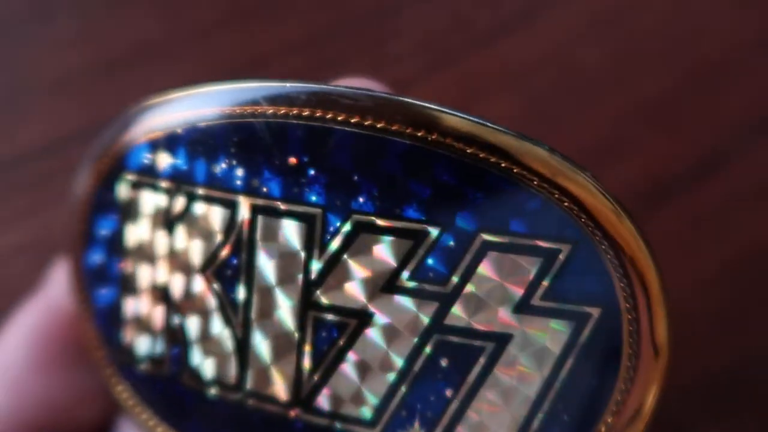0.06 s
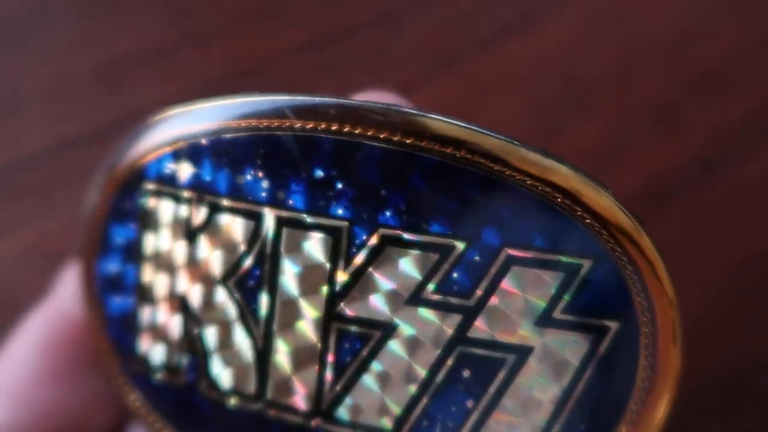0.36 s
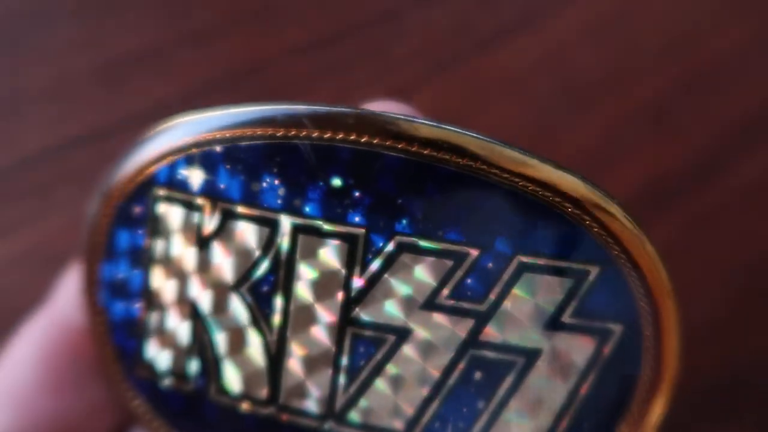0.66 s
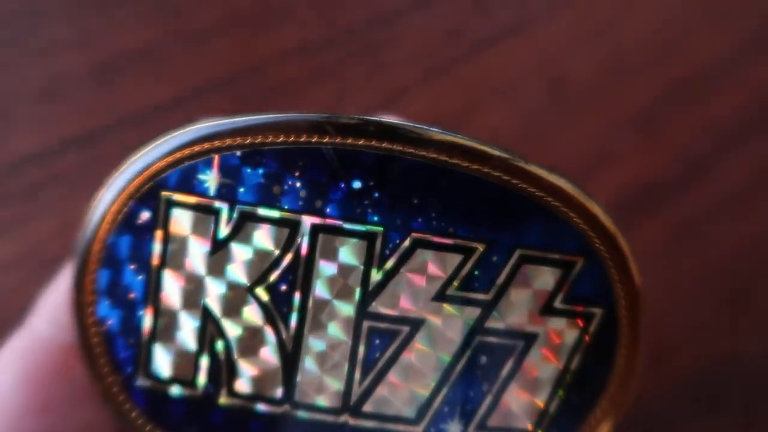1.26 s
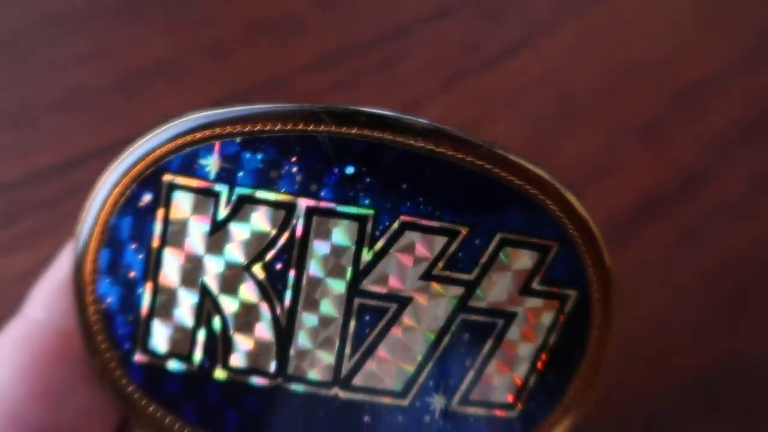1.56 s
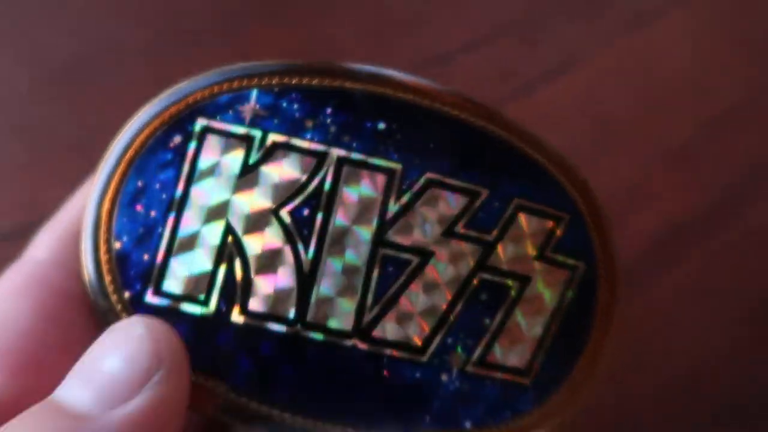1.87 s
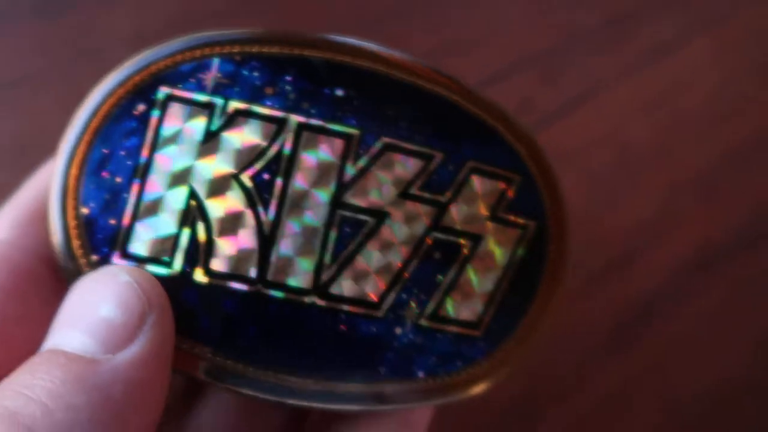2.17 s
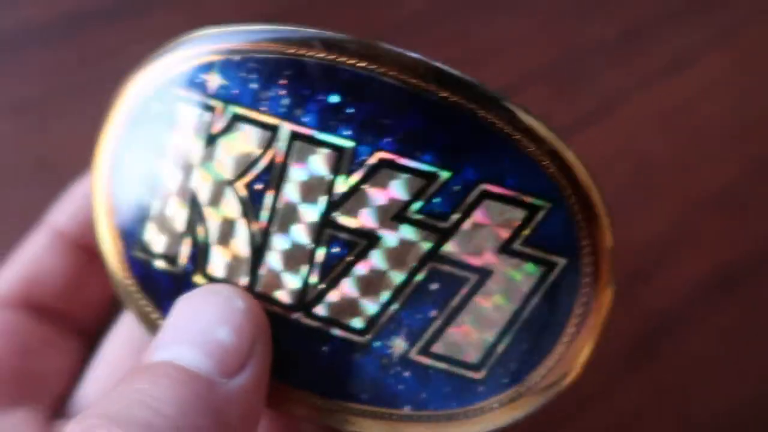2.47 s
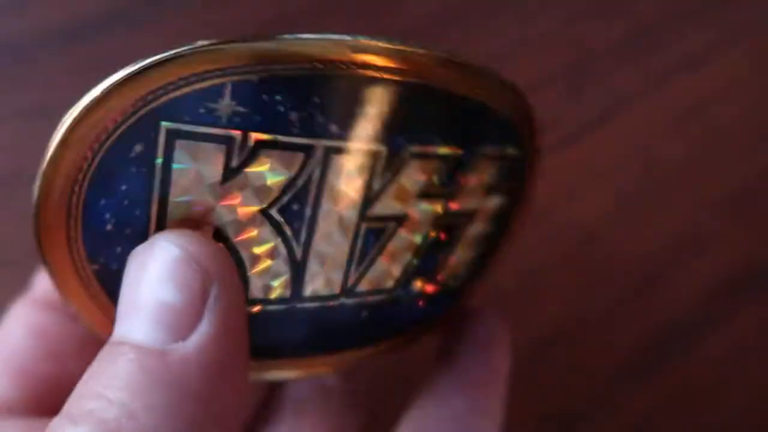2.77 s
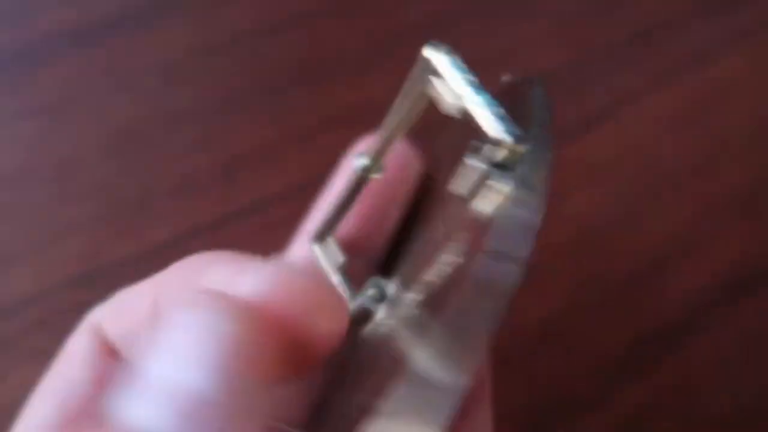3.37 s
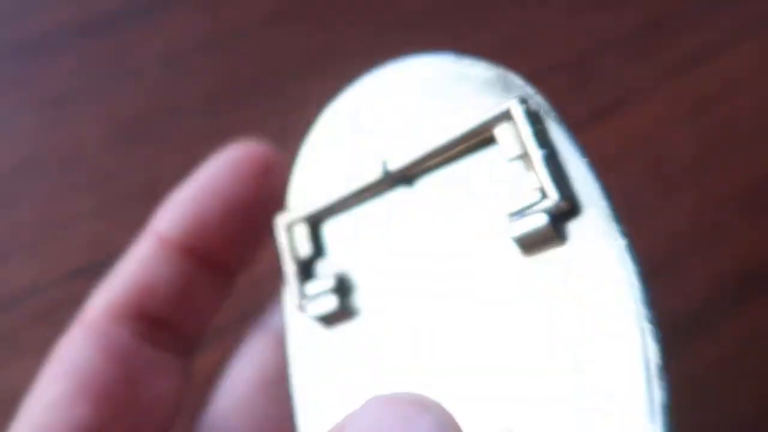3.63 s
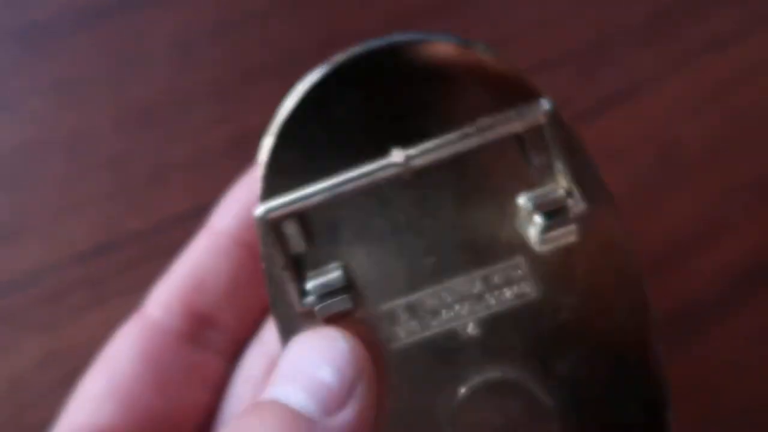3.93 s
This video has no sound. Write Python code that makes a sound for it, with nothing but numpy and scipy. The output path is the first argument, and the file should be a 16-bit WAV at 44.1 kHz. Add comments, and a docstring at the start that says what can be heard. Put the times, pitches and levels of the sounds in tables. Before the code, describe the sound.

A metal belt buckle clicks in the hand, close up, over faint room rumble and hiss. After a near-quiet start, light damped ticks come from about 1.9 seconds. At 2.8 seconds a sharper click starts a quick, light rattle of the loose loop. At 3.6 seconds the loop hits the plate with the loudest clatter, bright and briefly ringing. A few smaller clicks follow until 4 seconds.

```python
"""A metal belt buckle is turned over in the hand, close to a stereo microphone in a quiet room.
Its loose wire loop ticks in the hinges, damped by the fingers, scrapes, then falls against the plate
and rings. The held plate knocks dully and fingertips whisper on the metal. Room rumble, mains hum
and faint hiss lie below; a limiter ducks after the loudest clack."""
import sys
import numpy as np
from scipy import signal
from scipy.fft import rfft, irfft, next_fast_len
from scipy.io import wavfile
from scipy.ndimage import uniform_filter1d, minimum_filter1d, map_coordinates

SR = 44100
rng = np.random.default_rng(int(sys.argv[2]) if len(sys.argv) > 2 else 0)


def bounce(signal):
    """Save signal as a 16-bit WAV file at the path given by the first command-line argument."""
    frames = np.transpose(np.atleast_2d(signal))
    limited = np.clip(frames, -1, 1)
    pcm = np.round(limited * 32767).astype(np.int16)
    wavfile.write(sys.argv[1], SR, pcm)


N = 176400

# Stereo image of the contact noise. Each row: frequency in Hz, left-right likeness from -1 to 1.
CONTACT_LIKENESS = [(500, 0.94), (3000, 1), (5000, 1), (8000, 0.54), (12000, -0.52)]
CONTACT_T60_S = 0.027


def amp(db):
    """Decibels to gain."""
    return 10 ** (np.asarray(db) / 20)


def unit(x):
    """Scale to rms 1."""
    return x / np.sqrt(np.mean(x ** 2) + 1e-20)


def along(points, hz):
    """Interpolate (Hz, value) points on a log frequency axis."""
    f, v = np.transpose(points)
    return np.interp(np.log(hz + 1), np.log(f + 1), v)


def filtered(x, response):
    """Filter x by a gain that is a function of frequency."""
    n = x.shape[-1]
    m = next_fast_len(n + 4096)
    return irfft(rfft(x, m) * response(np.fft.rfftfreq(m, 1 / SR)), m)[..., :n]


def add(out, start, x):
    """Mix x into out from start, in seconds."""
    i = max(0, round(start * SR))
    out[:, i:i + x.shape[-1]] += x[..., :N - i]


def fade(t, t60):
    """Exponential decay, 60 dB down at t60."""
    return np.exp(-np.log(1000) * t / np.maximum(t60, 1e-4))


def stereo(pair, spectrum, likeness):
    """Two unrelated signals become left and right with a given colour and likeness, rms 1."""
    def mid_side_gains(hz):
        angle = np.arccos(np.clip(along(likeness, hz), -1, 1)) / 2
        return amp(along(spectrum, hz)) * [np.cos(angle), np.sin(angle)]
    mid, side = filtered(pair, mid_side_gains)
    return unit(np.array([mid + side, mid - side]))


def room_tone():
    """The quiet room at the microphone: slightly patchy rumble and hiss, with mains hum."""
    # Rumble and hiss. Each row: frequency in Hz, relative level in dB.
    spectrum = [(15, -77), (25, -24.5), (53, -1), (116, -5), (164, -9.5), (204, -12), (313, -13),
                (469, -14.5), (684, -22), (997, -21), (1530, -26.5), (1850, -25.5), (2060, -27),
                (4620, -33), (5430, -35.5), (13200, -46.5), (15500, -65)]
    # Centred rumble, wide hiss. Each row: frequency in Hz, left-right likeness.
    likeness = [(60, 1.0), (150, 0.95), (380, 0.09), (950, -0.017), (2380, -0.17), (5980, -0.09),
                (15000, -0.13)]
    # Mains tones. Each row: frequency in Hz, level in dB.
    mains = [(60, -62), (119.5, -58)]
    noise_db, patchy_db = -49, 2
    bins = signal.stft(rng.standard_normal((2, N)), nperseg=1024)[2]
    patches = uniform_filter1d(rng.standard_normal(bins.shape[1:]), size=6, axis=0)
    patches = uniform_filter1d(patches, size=9, axis=1)
    noise = signal.istft(bins * amp(patchy_db * unit(patches)), nperseg=1024)[1][:, :N]
    t = np.arange(N) / SR
    hum = sum(amp(db) * np.sqrt(2) * np.sin(2 * np.pi * (hz * t + rng.random())) for hz, db in mains)
    return amp(noise_db) * stereo(noise, spectrum, likeness) + hum


def room_reflections(x):
    """Quick reflections from table and hand reach the microphone with the room's faint tail."""
    # The tail's decay. Each row: frequency in Hz, t60 in seconds.
    decay = [(200, 0.51), (2000, 0.35), (8000, 0.27), (14000, 0.19)]
    # The tail's colour. Each row: frequency in Hz, gain in dB.
    colour = [(200, 12), (1200, -1.5), (3200, 3.5), (4450, -7), (5250, -5), (5620, 6.5), (6000, 1.5),
              (7700, -0.5), (8150, 7), (8600, 3.5), (10500, -1.5), (11700, 2.5), (13000, -2.5),
              (14600, 1.5)]
    tail_db, early_db, early_t60_s = -22, -15.5, .04
    hz, t, bins = signal.stft(rng.standard_normal((2, SR // 2)), SR, nperseg=256)
    tail = signal.istft(bins * fade(t, along(decay, hz)[:, None]), SR, nperseg=256)[1]
    tail = filtered(tail / np.linalg.norm(tail[0]), lambda hz: amp(along(colour, hz)))
    early = rng.standard_normal(tail.shape) * fade(np.arange(tail.shape[1]) / SR, early_t60_s)
    response = amp(tail_db) * tail + amp(early_db) * early / np.linalg.norm(early[0])
    response = np.pad(response, ((0, 0), (SR // 400, 0)))  # 2.5 ms after the direct sound
    return signal.fftconvolve(x, response, axes=1)[:, :N]


def finger_rubs():
    """Skin slides on metal: a faint narrow whisper that swells and fades."""
    # Each row: start in seconds, length in seconds (capped at 0.5), centre in Hz, level in dB.
    rubs = [(0.275, 0.14, 1710, -63.5), (1.462, .1, 810, -57), (1.828, 0.052, 1000, -58),
            (2.246, 0.27, 1028, -63), (2.519, 0.62, 1880, -64), (2.701, 0.2, 2600, -65.5),
            (3.351, 0.14, 2590, -60.5)]
    width = 0.07  # share of the centre frequency
    out = np.zeros((2, N))
    for start, length, centre, db in rubs:
        noise = rng.standard_normal(SR // 2)
        skin = filtered(noise, lambda hz: 1 / (1 + ((hz / centre - 1) / width) ** 2))
        n = min(int(length * SR), len(skin))
        add(out, start, amp(db) * unit(skin)[:n] * np.hanning(n) ** .5)
    return out


def plate_knocks():
    """A soft blow on the held plate stirs only its low modes."""
    # Each row: start in seconds, level in dB.
    blows = [(2.9223, -23.5), (2.9252, -28), (2.9277, -22), (3.6479, -31)]
    # The plate's low modes. Each row: frequency in Hz, level in dB, t60 in seconds.
    modes = [(170, -40, 0.046), (334.6, -9.5, 0.11), (412.4, -19, 0.13), (476, -9, 0.048), (648, -5, 0.094),
             (840, -18.5, 0.013), (1260, -28, 0.09), (1810, -23.5, 0.11)]
    out, t = np.zeros((2, N)), np.arange(SR // 4) / SR
    knock = sum(amp(db) * fade(t, t60) * np.sin(2 * np.pi * hz * t) for hz, db, t60 in modes)
    for start, db in blows:
        add(out, start, amp(db) * knock)
    return out


def metal_ring(t, ring_share, main_hz, ping_db, colour):
    """Loop and plate ring after one contact; a finger's grip shortens the modes and retunes the loop."""
    # Each row: frequency in Hz, level in dB, free t60 in seconds, left-right phase in radians.
    modes = [ (1219, -25, .2, .2), (1560, -27, .06, .2), (2110, -24, .05, .2), (3085, -20, .09, .3),
             (3290, -25, .05, .3), (3560, -24, .04, .4), (4330, -10, .05, .6), (4455, -1, .06, .7),
             (4530, -10, .055, .95), (5590, -3, .045, .8), (5700, -14, .045, 1.0), (6200, -24, .04, 1.0),
             (7970, -11, .03, 1.2), (8200, -11, .04, 1.3), (8700, -13, .05, 1.3), (10650, -19, .05, 1.5),
             (11700, -12, .06, 2.0), (12120, -7, .055, 2.1), (12900, -19, .04, 2.0), (14520, -19, .1, 1.5),
             (15300, -17, .06, 1.5)]
    scatter_db, detune, scatter_rad, attack_s = 1.8, .003, .3, 0.0014
    free_main_hz = 4465
    hz, db, t60, lead = np.transpose(modes)[:, :, None]
    strength, mistuning, turn = rng.standard_normal((3, len(hz), 1))
    is_ping = (hz > 3000) & (hz < 3400)  # the plate's ping
    is_loop = (hz > 4000) & (hz < 6000)
    gain = amp(db + scatter_db * strength + colour(hz) + ping_db * is_ping)
    envelope = gain * fade(t, t60 * ring_share)
    pitch = np.where(is_loop, main_hz / free_main_hz, 1)
    phase = 2 * np.pi * hz * pitch * (1 + detune * mistuning) * t
    lead = lead + scatter_rad * turn  # the buckle turns in front of the microphone
    pair = np.array([(envelope * np.sin(phase + side * lead / 2)).sum(0) for side in (1, -1)])
    return pair * (1 - np.exp(-t / attack_s))


def hinge_scrapes():
    """The loop slides in its hinges: dense tiny slips sound as grit and drive the metal's modes."""
    # Each row: start in seconds, length in seconds, level in dB.
    slides = [(2.952, 0.0078, -34), (3.095, 0.042, -39), (3.647, 0.0243, -28), (3.831, 0.0086, -35)]
    # The grit's colour. Each row: frequency in Hz, relative level in dB.
    spectrum = [(300, -25), (1200, -10.5), (2000, -3), (3200, 8), (4800, -4), (8300, -7), (10000, -9),
                (12000, 2.5), (15500, -12)]
    slips_per_s, fade_db, grit_db = 1900, 9, 1.5
    out, t = np.zeros((2, N)), np.arange(SR // 8) / SR
    for start, length, db in slides:
        slips = rng.standard_normal((2, len(t))) * (rng.random(len(t)) < slips_per_s / SR)
        ring = metal_ring(t, ring_share=.35, main_hz=4400, ping_db=0, colour=np.zeros_like)
        metal = signal.fftconvolve(slips[:1], ring, axes=1)[:, :len(t)]
        grit = amp(grit_db) * stereo(slips, spectrum, CONTACT_LIKENESS)
        stroke = amp(-fade_db * t / length) * fade(np.maximum(t - length, 0), CONTACT_T60_S)
        add(out, start, amp(db) * stroke * (unit(metal) + grit))
    return out


def loop_clicks():
    """Each contact of the loop is a short crack and a ring, coloured by where and how hard it lands."""
    # Each row: start in seconds, level in dB, share of the free ring time, crack in dB, main mode in Hz,
    # plate's ping in dB, then five tone gains in dB: body, second mode, treble, top, air.
    contacts = [ (.642, -47.5, 0.33, -3, 4700, 0, -6, -10, -10, -8, -25),
                (1.575, -44, 0.77, 6.5, 4350, -5, 8.5, -6, 0, -12, -28),
                (1.8602, -25, 0.4, 3, 4460, -16, 5, 9, 3, -13, -10),
                (1.8654, -20.5, 0.3, 0, 4500, -10, 0.5, 4.5, -18, -3.5, -13),
                (2.21, -24, 0.31, 3.5, 4290, 3.5, -2.5, 1.5, -7, -4.5, -26),
                (2.4896, -20.5, 0.25, 7.5, 4350, 11.5, -7, -5, 9, -8.5, -6),
                (2.669, -21.5, 0.38, 4, 4240, 9, -24, -10, -7, -13, -20),
                (2.7500, -33, 0.32, 4, 4270, 4, -1, -15, -8, -21, -42),
                (2.8045, -9.5, 0.21, -0.5, 4490, 7, -6.5, -4.5, -2, 5.5, 2),
                (2.807, -9.5, 0.27, 0.5, 4380, 18, -15.5, -15, 1, -2, -8),
                (2.813, -38, 0.34, 7, 4500, 8, 2, 10, -10, -2, -30),
                (2.8516, -43, 0.9, 1, 4400, 4, 0, -3, -10, -9, -24),
                (2.8698, -23, 0.33, 2.5, 4410, 15, -3, -12, 0, -3, -13),
                (2.9259, -31.5, 0.7, 4, 4460, 5, 4, -8, 1.5, 1, -6),
                (2.9324, -29.5, 0.35, 6.5, 4500, 17.5, 17.5, 0, 6, 4, 2),
                (2.9414, -33, 0.2, 9, 4530, 12, 13, 9, 2, 9, 12),
                (2.946, -24.5, 0.32, 2, 4550, 15, 3.5, 2, 10, 17, 9),
                (2.976, -30, 0.61, 3, 4460, 7, 1.5, -10, -3, -8, -20),
                (3.031, -46.5, 1, 8, 4350, 2, 5.5, -6, 8.5, -2, -18),
                (3.0894, -20, 0.79, -8, 4490, 12, -6.5, -11, -1, 1, -15),
                (3.0914, -27.5, 0.2, 5.5, 4600, 19, 9, 1, 3, 1, -2),
                (3.103, -43, 0.6, 4, 4470, 0, 2, 8, 13, 14, 16),
                (3.110, -45, .4, 5, 4500, 8, 2, 0, 18.5, 12, 2),
                (3.115, -42, 0.8, 6, 4420, 8, 6, -3, 10, 10, 2),
                (3.126, -29, 0.35, 0, 4590, 2, 1, 7, 7, 14, -2),
                (3.137, -45.5, 0.9, 8, 4570, -4, -3, 13, 8, 6, -3),
                (3.237, -56, 0.64, 0, 4500, 5, 14, 7, 8, 10.5, -16),
                (3.3185, -39.5, 0.5, 8, 4400, 9.5, 8, 7.5, 2.5, 1, -25),
                (3.462, -27, 0.72, 0.5, 4484, 12.5, -9, -9, -2.5, -7, -10),
                (3.5871, -28, 1, 2, 4340, 6, -5, -8, 10, 7, -2.5),
                (3.5975, -13, 1, -2, 4480, -1, 1, 0, 0.5, -6.5, 4.5),
                (3.6049, 6, 0.99, -1.5, 4502, -1, -1.5, 0.5, 5, 1, 1.5),
                (3.6373, 2, 0.88, -1.5, 4420, 4, -8.5, -8.5, -1, -11, -5),
                (3.6459, -2, 0.46, 6, 4450, 3, 4.5, 7.5, 9.5, 0.5, 5.5),
                (3.6528, 3, 0.33, -4, 4403, 11, -12.5, -2.5, 2, -1.5, -4),
                (3.692, -43, .4, -2, 4500, 2.5, -10, 6, 17, 0, -15),
                (3.8341, -10, 0.85, 1.5, 4430, -1, -5, -4, -9, -3.5, -14),
                (3.8683, -21.5, .5, 4.5, 4520, 7, -3.5, 0, -4, -3, -18),
                (3.8763, -24.5, 0.54, 8, 4420, 16, -11, -9, -4.5, -9, -20),
                (3.9123, -47, 0.6, 3, 4500, -2, 5, -7, 3, -9, -33),
                (3.9633, -19, 0.61, -2.5, 4480, 3, -5.5, -3.5, -2, -8, -8),
                (3.9787, -16, 0.3, -3, 4420, -1, -2, -1.5, -4, -14, -21), ]
    # Where the five tone gains act, in Hz.
    tone_hz = [3000, 5500, 8200, 12000, 14500]
    # The bass point, the body's lower edge and the top's upper edge, in Hz.
    edge_hz = [700, 1300, 12400]
    # Edges of the band around the main mode that the tone gains leave flat, in Hz.
    flat_hz = [4000, 4700]
    # The crack's colour. Each row: frequency in Hz, relative level in dB.
    spectrum = [(100, -14.5), (400, -4.5), (800, 2), (1500, -0.5), (2600, -1.5), (3200, -5.5), (4500, 1.5),
                (6500, -3.5), (8200, -1), (9700, -5.5), (12000, -1.5), (13600, -10.5), (15500, 7.5)]
    crack_trim_db, attack_s, base_t60_s = -4, 0.00036, 0.011
    ripple_db, ripple_step_hz, bass_db_per_db = 0.5, 90.5, 0.72
    out, t = np.zeros((2, N)), np.arange(SR // 5) / SR
    knots = rng.standard_normal(size=400)  # many weak resonances colour every crack
    ripple = lambda hz: amp(ripple_db * map_coordinates(knots, [hz / ripple_step_hz], mode="nearest"))
    for start, db, ring_share, crack_db, main_hz, ping_db, *tone in contacts:
        body, _, _, top, _ = tone
        bass = min(body, 0) + bass_db_per_db * db  # light contacts have less bass
        points = list(zip(tone_hz + edge_hz, tone + [bass, body, top]))
        points = sorted(points + [(hz, 0) for hz in flat_hz])
        colour = lambda hz: along(points, hz)
        grit = filtered(rng.standard_normal((2, len(t))), ripple)
        crack = filtered(stereo(grit, spectrum, CONTACT_LIKENESS), lambda hz: amp(colour(hz)))
        envelope = fade(t, base_t60_s + CONTACT_T60_S * ring_share) * (1 - np.exp(-t / attack_s))
        crack *= amp(crack_trim_db + crack_db) * envelope
        ring = metal_ring(t, ring_share, main_hz, ping_db, colour)
        add(out, start, amp(db) * (ring + crack))
    return out


def scene():
    """The buckle close to the microphone, the room faint behind it."""
    buckle = loop_clicks() + hinge_scrapes() + plate_knocks() + finger_rubs()
    return buckle + room_reflections(buckle) + room_tone()


def record(dry):
    """A limiter ducks at once, holds and recovers slowly; then the microphone's colour and band limit."""
    # The microphone's response. Each row: frequency in Hz, gain in dB.
    microphone = [(8800, 2), (9700, 0), (10700, 1.5), (12300, -1), (13400, 3.5), (14600, 0), (15400, -10),
                  (15900, -14)]
    threshold_db, hold_s, release_db_per_s, top_hz = -7.5, 0.11, 23, 15875
    power = np.abs(uniform_filter1d((dry ** 2).mean(0), size=128))
    over_db = np.maximum(10 * np.log10(power + 1e-12) - threshold_db, 0)
    hold = 2 * int(hold_s * SR / 2) + 1
    held = -minimum_filter1d(-over_db, hold, origin=hold // 2, mode="constant")
    release = release_db_per_s * np.arange(N) / SR
    duck_db = uniform_filter1d(np.maximum.accumulate(held + release) - release, size=32)
    limited = np.clip(dry * amp(-duck_db), -1, 1)  # stray peaks are cut off
    return filtered(limited, lambda hz: amp(along(microphone, hz)) / np.sqrt(1 + (hz / top_hz) ** 220))


dry = scene()
out = record(dry)
bounce(out)
```